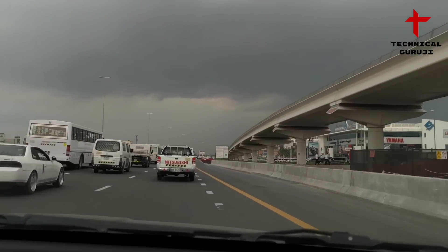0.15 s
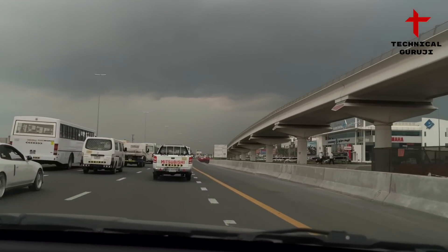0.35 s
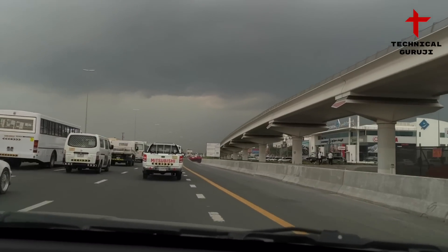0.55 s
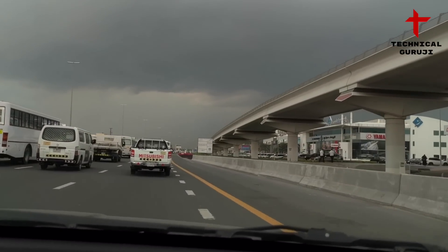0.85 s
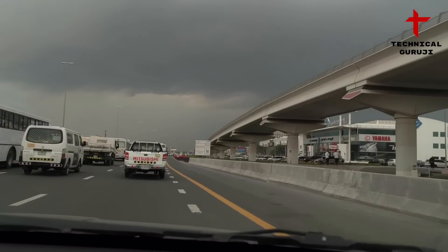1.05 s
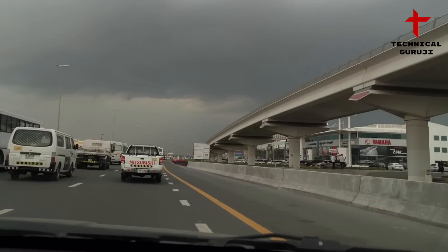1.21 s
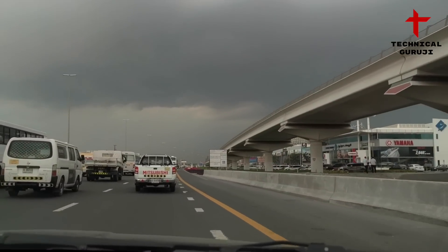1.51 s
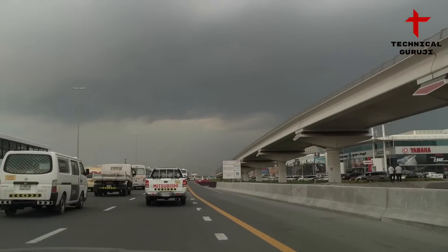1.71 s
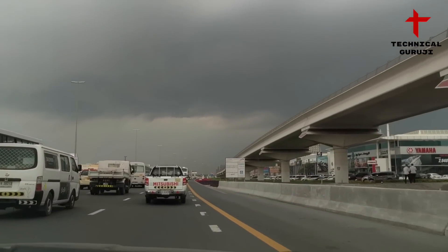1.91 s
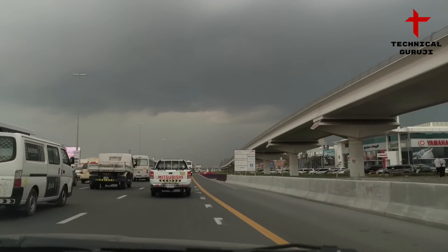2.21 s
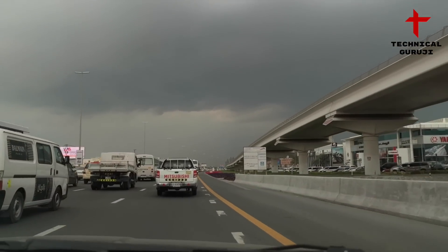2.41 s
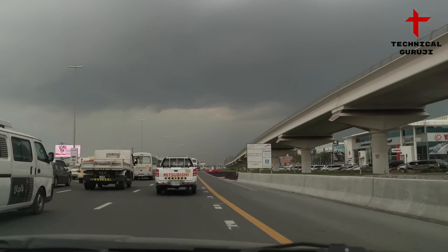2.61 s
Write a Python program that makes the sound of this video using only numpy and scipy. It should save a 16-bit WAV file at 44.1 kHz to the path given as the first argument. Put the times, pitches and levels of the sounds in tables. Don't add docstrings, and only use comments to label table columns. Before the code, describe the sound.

Inside a moving car, the microphone near the windscreen picks up deep road rumble and wavering engine hum under faint hiss and ticks; a heavy vehicle's brakes squeal thinly, release air, then loose plastic clicks.

```python
import sys
import numpy as np
from scipy import signal
from scipy.fft import rfft, irfft, next_fast_len
from scipy.io import wavfile
from scipy.ndimage import uniform_filter1d, map_coordinates

SR = 44100
rng = np.random.default_rng(int(sys.argv[2]) if len(sys.argv) > 2 else 0)


def wrap_up_sound(samples):
    columns = np.atleast_2d(samples).T
    tamed = np.clip(columns, -1, 1)
    steps = np.round(tamed * 32767).astype(np.int16)
    wavfile.write(sys.argv[1], SR, steps)


def field_ratio(decibels):
    return 10 ** (np.asarray(decibels, dtype=float) / 20)


N = 121275

# [t/s, level/dB]
BODY_SHAKE = [(0.0, -31.5), (0.28, -39), (0.33, -30.5), (0.51, -41), (0.86, -32), (0.93, -41), (1.0, -31.5),
              (1.6, -39.5), (1.68, -32), (1.81, -46), (1.89, -34.5), (2.2, -39.5), (2.23, -32.5),
              (2.38, -43.5), (2.68, -34), (2.75, -43)]
# [f/Hz, level/dB per Hz]
ROAD_SPECTRUM = [(12, -35), (20, -29), (38, -2), (86, -3), (123, -1), (152, -4.5), (184, -6), (270, -11),
                 (330, -31), (430, -56), (730, -120)]
# [f/Hz, level/dB per Hz]
TYRE_SPECTRUM = [(150, -18.5), (260, -4.5), (340, -5), (600, -15.5), (1100, -18), (2200, -28.5),
                 (3600, -37), (6500, -52), (12000, -89)]
# [f/Hz, level/dB, wander/Hz, wander rate/(1/s), swell/dB, share of shake]
HUMS = [(49.5, -37, 4.1, 14, 2.5, 1.1), (97.6, -41.5, 4.8, 9, 1.5, -0.065),
        (117.95, -37.5, 5.07, 10, 1.2, -0.15), (188.5, -40.5, 3.5, 6.03, 4, 0.39),
        (215.6, -40.5, 3, 7, -0.5, 0.17), (240.4, -44, 9, 14, 1.5, -0.23)]
# [f/Hz, width/Hz, lift/dB]
CABIN_PANELS = [(483, 84, 6), (1158, 65, 4.5), (1576, 240, 2.5), (2156, 170, 2.5), (3870, 440, -0.5)]
# [f/Hz, level/dB per Hz]
HISS_SPECTRUM = [(2000, -9), (4000, -5), (6500, -2.5), (9000, -2.5), (11000, -4), (16000, -1.5)]
# [f/Hz, level/dB per Hz]
FIZZ_SPECTRUM = [(7000, -60), (10000, 2), (12000, 6), (16000, 0)]
# [t/s, peak level/dB]
TICKS = [(0.175, -44), (0.4815, -43), (0.7801, -45), (1.0968, -44), (1.711, -44), (2.0183, -46),
         (2.2048, -42.5), (2.6322, -42.5)]
# [f/Hz, level/dB]
TICK_SPECTRUM = [(7500, -53), (9000, -4), (10000, -2.5), (16000, -4)]
# [t/s, length/s, level/dB, f/Hz, glide/Hz]
GRIPS = [(0.471, 0.022, -65, 7577, 11), (0.51, 0.098, -54.5, 7580, 42), (0.644, 0.075, -49.5, 7605, 14.5),
         (0.73, .02, -52.5, 7634, 15), (0.762, 0.027, -79, 7790, 20), (0.798, 0.05, -50.5, 7640, -7.5),
         (0.842, 0.035, -56.5, 7630, -21.5), (0.901, 0.023, -62, 7633, 4), (.905, .05, -71, 7800, 80),
         (.945, .06, -69, 7890, -60), (0.992, 0.024, -52.5, 7660, 2), (1.014, 0.04, -60.5, 7660, -10),
         (1.06, 0.04, -72, 7760, 90), (1.095, 0.055, -73, 7900, -60.5), (1.145, 0.047, -56, 7680, 1),
         (1.22, 0.08, -57, 7610, -45), (1.292, .035, -62, 7560, -10), (.61, .04, -79, 7760, 8)]
# [f/Hz, level/dB per Hz]
DRAG_SPECTRUM = [(7100, -60), (7450, -12), (7650, 0), (7850, -1), (7980, -12), (8200, -60)]
# [t/s, level/dB]
AIR_FLOW = [(1.2, -32), (1.29, -12), (1.34, -5.5), (1.44, 1), (1.5, -4), (1.57, -3.5), (1.66, -11.5),
            (1.92, -11), (2.02, -30)]
# [f/Hz, level/dB per Hz]
VENT_SPECTRUM = [(1500, -26), (3000, 3.5), (6000, 0), (9000, 0), (13500, -1.5), (16000, -6.5)]
# [t/s, length/s, level/dB, f/Hz]
VALVE_WHISTLES = [
    (1.25, .1, -56.5, 1170),
    (1.262, .025, -70, 3720),
    (1.293, .07, -68.5, 3440),
    (1.335, .02, -70, 2150),
    (1.338, .02, -69, 5000),
    (1.42, .025, -66, 2850),
]
# [t/s, level/dB, life/s, share of one clean blow]
RATTLES = [
    (2.411, -62, .003, .3),
    (2.4700, -46, 0.003, 1.),
    (2.4715, -47, 0.0045, 1.),
    (2.480, -55, 0.008, .2),
]
# [f/Hz, width/Hz, level/dB]
TRIM_PARTS = [
    [(5000, 900, 0), (6900, 700, -6)],
    [(2040, 90, 4), (2300, 110, 6), (2970, 120, 2), (3500, 200, -4)],
    [(3910, 70, 7), (4100, 70, 6), (4660, 80, 2), (5300, 90, -4), (5680, 90, -5), (7400, 160, -7)],
    [(3950, 230, 2), (4700, 150, -2), (5400, 200, -3), (6200, 150, 0), (6600, 150, -4), (7300, 250, -4)],
]


def unit(x):
    return x / np.sqrt(np.mean(x ** 2) + 1e-20)


def along(points, hz):
    f, v = np.transpose(points)
    return np.interp(np.log(hz + 1), np.log(f + 1), v)


def wobble(rate):
    return map_coordinates(rng.standard_normal(2000), [np.arange(N) * min(rate, 600) / SR])


def filtered(x, response):
    m = next_fast_len(N + SR // 2)
    return irfft(rfft(x, m) * response(np.fft.rfftfreq(m, 1 / SR)), m)[:N]


def rush(spectrum, patchy_db):
    z = signal.stft(rng.standard_normal(N), nperseg=512)[2]
    field = uniform_filter1d(rng.standard_normal(z.shape), size=6, axis=0)
    field = uniform_filter1d(field, size=14, axis=1)
    x = signal.istft(z * field_ratio(patchy_db * unit(field)), nperseg=512)[1][:N]
    return unit(filtered(x, lambda hz: field_ratio(along(spectrum, hz))))


def gate(start, length, rise, fall):
    t = np.arange(N) / SR - start
    opening = np.sin(np.pi / 2 * np.clip(t / rise, 0, 1))
    closing = np.sin(np.pi / 2 * np.clip((length - t) / fall + 0.5, 0, 1))
    return (opening * closing) ** 2


def tone(hz):
    return np.sqrt(2) * np.sin(2 * np.pi * (np.cumsum(hz) / SR + rng.random()))


def engine_hums(shake_db):
    hums = np.zeros(N)
    for hz, level_db, wander_hz, rate, swell_db, share in HUMS:
        level = field_ratio(level_db + swell_db * wobble(0.796 * rate) + share * shake_db)
        hums += level * tone(hz + wander_hz * wobble(rate))
    return hums


def road_rumble(shake_db):
    return field_ratio(-32.5 + 0.18 * shake_db) * rush(ROAD_SPECTRUM, patchy_db=0.06)


def tyre_roar():
    def panels(f):
        return field_ratio(sum(db / (1 + (2 * (f - c) / w) ** 2) for c, w, db in CABIN_PANELS))

    level = field_ratio(-45.5 + 0.61 * wobble(2.03) + 0.13 * wobble(12))
    return level * filtered(rush(TYRE_SPECTRUM, patchy_db=0.7), panels)


def drive():
    s, db = np.transpose(BODY_SHAKE)
    shake_db = np.interp(np.arange(N) / SR, s, db - db.mean())
    return engine_hums(shake_db) + road_rumble(shake_db) + tyre_roar()


def camera_hiss():
    fizz = field_ratio(-75 + 5 * np.tanh(wobble(60))) * rush(FIZZ_SPECTRUM, patchy_db=1.2)
    return fizz + field_ratio(-68.5) * rush(HISS_SPECTRUM, patchy_db=-1.0)


def camera_ticks():
    ticks, specks = np.zeros(N), rng.random((70, 2))
    ticks[(specks[:, 0] * N).astype(int)] = field_ratio(-50 - 5 * specks[:, 1])
    for s, db in TICKS:
        ticks[round((s + 0.0012) * SR)] = field_ratio(db + 13.5)
    ticks = ticks + 0.3 * np.roll(ticks, 17)
    return filtered(ticks, lambda hz: field_ratio(along(TICK_SPECTRUM, hz)))


def drum_squeal():
    t, sing = np.arange(N) / SR, np.zeros(N)
    chatter = 1 + 0.2 * tone(125 + 25 * wobble(40))
    for s, length, db, hz, glide_hz in GRIPS:
        level = field_ratio(db + 2.2 * np.tanh(wobble(70.3))) * gate(s, length, rise=0.022, fall=0.028)
        pitch = hz + glide_hz * (t - s) / length + 11 * wobble(70.1)
        sing += level * tone(pitch) * (chatter + field_ratio(-15) * wobble(320))
    return sing


def shoe_drag():
    level = field_ratio(-74 + 1.5 * np.tanh(wobble(30.4))) * gate(0.47, 0.87, rise=0.064, fall=0.035)
    return level * rush(DRAG_SPECTRUM, patchy_db=4.0)


def dipped_above_squeal(x):
    squeal = filtered(x, lambda hz: (hz > 7300) & (hz < 8000))
    loud = uniform_filter1d(squeal ** 2, size=SR // 25) > field_ratio(2 * -55.5)
    hide = np.roll(uniform_filter1d(1.0 * loud, size=SR // 60), round(0.02 * SR))
    band = filtered(x, lambda hz: abs(hz - 8500) < 700 / 2)
    return x - (1 - field_ratio(-34)) * hide * band


def air_vent():
    flow_db = np.interp(np.arange(N) / SR, *np.transpose(AIR_FLOW), left=-60, right=-60)
    return field_ratio(-57.5 + 0.6 * wobble(29.8)) * field_ratio(flow_db) * rush(VENT_SPECTRUM, patchy_db=0.8)


def valve_whistle():
    whistle = np.zeros(N)
    for s, length, db, hz in VALVE_WHISTLES:
        level = field_ratio(db + 1.5 * np.tanh(wobble(80))) * gate(s, length, rise=0.0083, fall=0.015)
        whistle += level * tone(hz + 8 * wobble(60))
    return whistle


def trim_rattle():
    t, out = np.arange(N) / SR, np.zeros(N)
    for (s, db, life, blow), part in zip(RATTLES, TRIM_PARTS):
        def plastic(f):
            ring = sum((-1) ** k * field_ratio(g) * 1j * f * w / (c * c - f * f + 1j * f * w)
                       for k, (c, w, g) in enumerate(part))
            return ring * f / (f + 1200) / (1 + (f / 8000) ** 8)

        u = np.clip(t - s, 0, None) / life
        contact = (1 - blow / 2) * u * np.exp(-u) * rng.standard_normal(N)
        contact[round((s + life) * SR)] = blow * np.sqrt(life * SR) / 2
        out += field_ratio(db + 20) * filtered(contact, plastic)
    return out


def scene():
    brake = drum_squeal() + shoe_drag() + air_vent() + valve_whistle()
    return (drive() + brake + trim_rattle())[None]


def top_cut(x):
    return signal.sosfilt(signal.butter(12, 15720, fs=SR, output="sos"), x)


def record(dry):
    edge_s = 0.002
    x = dry / (1 + np.abs(dry / 0.15) ** 3) ** (1 / 3)
    x = x * gate(-edge_s / 5, N / SR - edge_s / 2, rise=edge_s / 2, fall=edge_s)
    x = x + camera_hiss() + camera_ticks()
    mix = dipped_above_squeal(x[0])[None]
    return top_cut(mix)


dry = scene()
out = record(dry)
wrap_up_sound(out)
```